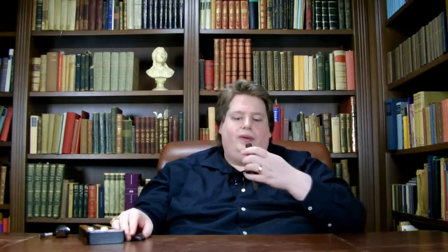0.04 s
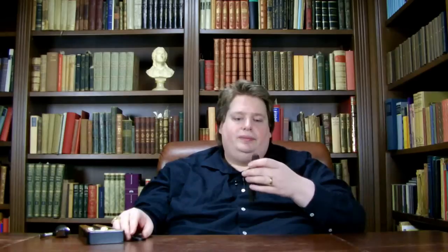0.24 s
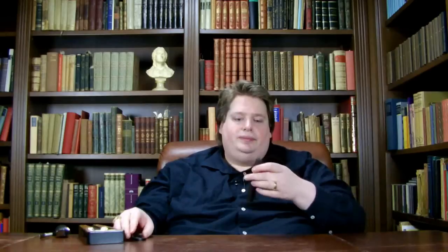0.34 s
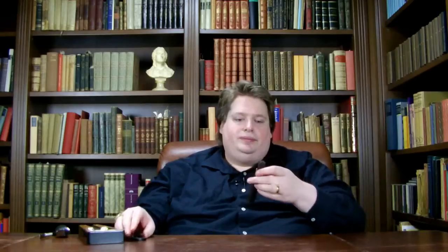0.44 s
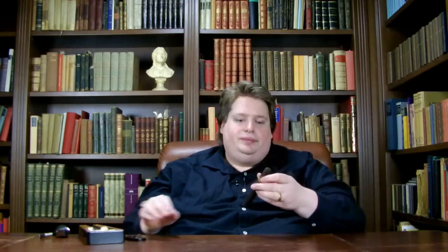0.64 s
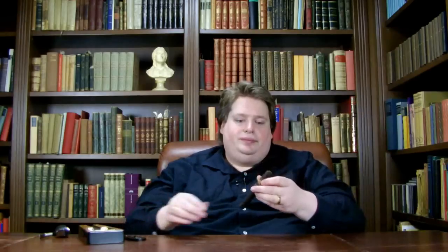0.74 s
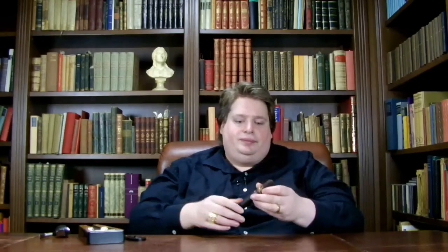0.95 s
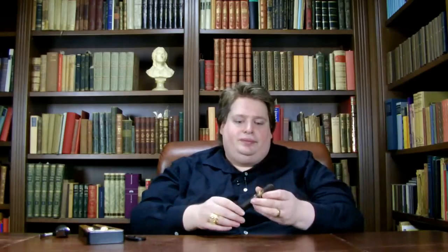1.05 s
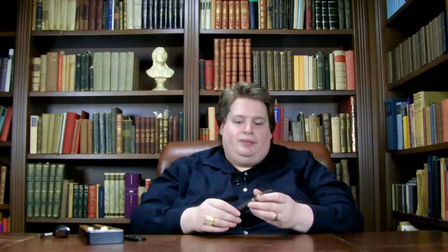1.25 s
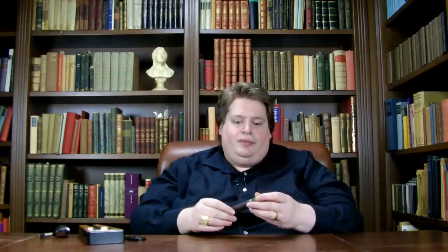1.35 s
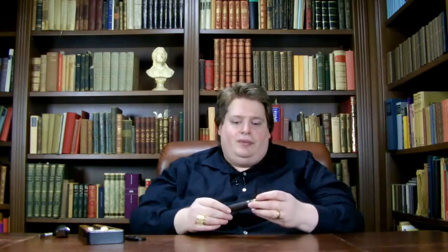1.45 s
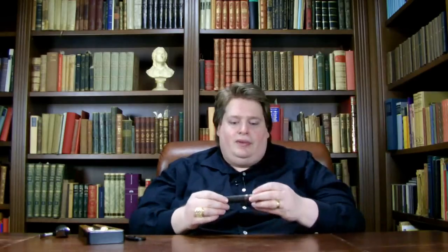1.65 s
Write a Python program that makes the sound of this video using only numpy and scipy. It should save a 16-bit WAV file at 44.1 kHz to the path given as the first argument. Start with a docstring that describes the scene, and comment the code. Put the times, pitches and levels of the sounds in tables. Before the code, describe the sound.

At about 0.2 seconds a small hard object grazes a wooden desk and lands with one sharp, bright knock. The desk and room ring briefly, fading by about 0.6 seconds. Sleeves brush very faintly from 0.4 to 1.1 seconds, and tiny clicks come near 1.2, 1.3 and 1.7 seconds. Faint, rapid electrical ticking, quiet room hush and microphone hiss run throughout.

```python
"""A knock on a wooden desk

A small hard object is put down in a book-lined room: it grazes, tips, then lands with one sharp knock.
The object clacks, the desk top rings and the room answers; sleeves brush faintly as the arms move.
Under it lie a few tiny clicks, a camera's faint electrical ticking, room hush and microphone hiss."""
import sys
import numpy as np
from scipy import signal
from scipy.fft import rfft, irfft
from scipy.io import wavfile

SR = 44100
rng = np.random.default_rng(int(sys.argv[2]) if len(sys.argv) > 2 else 0)


def digitize_waveform(pressure):
    """Quantize a signal to 16-bit integers and store it at the path in sys.argv[1].

    Rows of a 2-D input are taken as channels; values are limited to [-1, 1].
    """
    field = np.atleast_2d(pressure).T
    bounded = np.clip(field, -1, 1)
    quanta = np.round(bounded * 32767).astype(np.int16)
    wavfile.write(sys.argv[1], SR, quanta)


N = 74970

# each touch on the desk: start_s, level_db, brightness_hz
TOUCHES = [(0.221, -14.5, 950), (0.2365, -24.5, 5060), (0.2418, 0, 14200)]
# the notes that object and desk ring with: pitch_hz, level_db, fade_s (time to fall by 60 dB)
OBJECT_NOTES = [(730, -29, 0.028), (922, -37, 0.073), (1435, -31, 0.029), (2190, -20, 0.022),
                (2410, -29, 0.046), (2850, -35, 0.063), (3323, -14, 0.01), (3650, -14, 0.0088),
                (5370, -22.5, 0.0089), (5910, -23.5, 0.0077), (7580, -29.5, 0.0093), (8100, -30.5, 0.015),
                (8960, -36, 0.0085), (10260, -24, 0.0059)]
DESK_NOTES = [(320.6, -58.5, .2), (694, -50.5, 0.48), (922, -50, 0.26), (974.5, -42, 0.21),
              (1043, -38, 0.32), (1244, -43.5, .21), (1308, -51.5, 0.37), (1529, -61, 0.34),
              (2520, -43, 0.26), (2854, -49, 0.22)]
# how long the room's echo takes to fall by 60 dB: pitch_hz, fade_s
ECHO_FADES = [(250, 0.32), (700, 0.41), (1800, 0.42), (4500, 0.37), (8000, 0.3), (14000, 0.26)]
# each soft swell of noise: start_s, end_s, level_db; the first is a faint hush at the very start, the others
# are sleeves brushing as the arms move
NOISE_SWELLS = [(-.04, 0.074, -63), (0.398, 0.639, -66.5), (0.652, 1.12, -66)]
# each stray click: start_s, level_db
STRAY_CLICKS = [(.0645, -47), (1.2062, -44), (1.306, -47), (1.6735, -36.5)]

# a colour says how strong a sound's low and high parts are next to each other: pitch_hz, level_db
CRACK_COLOUR = [(100, -22.5), (400, -12.5), (1200, -8), (3300, 1), (4500, -19), (6000, 8.5), (10300, 1),
                (11700, -11), (15000, 0)]
ECHO_COLOUR = [(50, -40), (130, -28), (230, -18), (400, -4.5), (700, -1), (1600, -1.5), (2400, -0.5),
               (3500, -4), (4400, -11), (5800, -12.5), (8300, -14), (11500, -26), (15000, -28)]
SLEEVE_COLOUR = [(50, -42), (220, -17.5), (340, -7), (600, -4.5), (1000, 1), (1500, -9), (2500, -11.5),
                 (5000, -16), (12000, -26)]
CLICK_COLOUR = [(50, -22), (500, -2), (1500, 3), (3400, 1), (5000, -7), (14000, -14)]
TICK_COLOUR = [(25, -38), (60, -16), (150, -2), (400, 1.5), (1200, 0), (2000, -6.5), (3200, -11.5),
               (5000, -13), (14000, -19)]
HUSH_COLOUR = [(20, -48), (50, -21), (100, -11.5), (200, -10.5), (330, -2.5), (650, 0.5), (1100, -1.5),
               (1800, -5), (3000, -7), (6000, -21), (15000, -42)]
HISS_COLOUR = [(30, -36), (300, -9), (1500, -3.5), (5000, 1), (6500, -.5), (8900, 0), (9120, 5), (9350, 0),
               (15000, -1)]
WIDE_HISS_COLOUR = [(50, -48), (500, -9), (2500, -7), (5000, -4), (10000, -5.5), (15000, -7.5)]


def knock():
    """Each touch sets object, desk and room sounding, each muffled to its own brightness."""
    clack = ring(OBJECT_NOTES, rise_s=0.001)
    desk = ring(DESK_NOTES, rise_s=0.0029)
    blow = clack + desk + crack() + room_echo()
    out = np.zeros(N)
    for start_s, level_db, brightness_hz in TOUCHES:
        start = round(start_s * SR)
        softened = signal.lfilter(*signal.butter(2, brightness_hz, "lowpass", fs=SR), blow)
        out[start:] += gain(level_db) * softened[:N - start]
    return out


def ring(notes, rise_s):
    """A struck thing shakes at its own pitches, which build up quickly and die away."""
    t = np.arange(N) / SR
    out = np.zeros(N)
    for pitch_hz, level_db, fade_s in notes:
        out += gain(level_db - 60 * t / fade_s) * np.sin(2 * np.pi * pitch_hz * t)
    return (1 - np.exp(-t / rise_s)) * out


def crack(level_db=-26.5, peak_s=0.0012, width_s=0.00047):
    """Two hard faces meet and give off about a millisecond of bright noise."""
    t = np.arange(N) / SR
    swell = np.exp(-0.5 * ((t - peak_s) / width_s) ** 2)
    burst = swell * rng.choice([-1.0, 1.0], N)
    return gain(level_db) * tint(burst, CRACK_COLOUR)


def room_echo(level_db=-36.5, delay_s=0.003, rise_s=0.0032):
    """Sound bounces around the room and blurs into a short tail; the highest part dies first."""
    pitch_hz, time_s, bands = signal.stft(noise(ECHO_COLOUR), SR, nperseg=256)
    fade_s = look_up(ECHO_FADES, pitch_hz)[:, None]
    tail = signal.istft(bands * gain(-60 * time_s / fade_s), SR)[1][:N]
    fade_in = np.clip((np.arange(N) / SR - delay_s) / rise_s, 0, 1)
    return gain(level_db) * tail * fade_in


def sleeves(fade_s=0.05):
    """Soft swells of noise: a faint one at the very start, then cloth rubbing as the arms move."""
    t = np.arange(N) / SR
    loudness = np.zeros(N)
    for start_s, end_s, level_db in NOISE_SWELLS:
        inside_s = np.minimum(t - start_s, end_s - t)
        loudness += gain(level_db) * np.clip(inside_s / fade_s + 0.5, 0, 1)
    return loudness * noise(SLEEVE_COLOUR)


def clicks():
    """A few tiny clicks with no echo."""
    spikes = np.zeros(N)
    for start_s, level_db in STRAY_CLICKS:
        spikes[round(start_s * SR)] += gain(level_db)
    return tint(spikes, CLICK_COLOUR)


def ticking(level_db=-41.5, ticks_per_s=30, first_s=0.0318, length_s=0.0045, wobble_s=0.0006):
    """Steady electrical ticks, each a quick run of five spikes that get weaker."""
    tick = np.arange(N * ticks_per_s // SR)[:, None]
    spike = np.arange(5)
    wobble, direction = rng.uniform(-1, 1, (2, len(tick), len(spike)))
    start_s = first_s + tick / ticks_per_s + length_s * spike / len(spike) + wobble_s * wobble
    tick_db = level_db + 0.7 * rng.uniform(-1, 1, tick.shape)
    tick_db[2::3] += 1.9  # every third tick is stronger
    heights = np.sign(direction) * gain(tick_db - 1.3 * spike)
    starts = (start_s * SR).astype(int)
    spikes = np.bincount(starts.ravel(), heights.ravel(), N)[:N]
    return tint(spikes, TICK_COLOUR)


def background(hush_db=-69, hiss_db=-67, wide_db=-72):
    """Room hush and microphone hiss sit in the middle; a fainter hiss spreads left and right."""
    wide_hiss = gain(wide_db) * noise(WIDE_HISS_COLOUR) * np.array([[1], [-1]])
    return gain(hush_db) * noise(HUSH_COLOUR) + gain(hiss_db) * noise(HISS_COLOUR) + wide_hiss


def gain(level_db):
    """Turns decibels into a number to multiply by."""
    return 10 ** (np.asarray(level_db) / 20)


def look_up(table, pitch_hz):
    """Reads between a table's rows, with pitch spaced in octaves."""
    row_hz, values = np.transpose(table)
    return np.interp(np.log(pitch_hz + 1), np.log(row_hz + 1), values)


def noise(colour):
    """Steady noise of the given colour, with an average strength (rms) of 1."""
    shape = gain(look_up(colour, np.fft.rfftfreq(N, 1 / SR)))
    sound = irfft(rfft(rng.standard_normal(N)) * shape, N)
    return sound / np.sqrt(np.mean(sound ** 2))


def tint(sound, colour, size=2048):
    """Gives a sound a colour, using a filter that rings only after each spike."""
    pitch_hz = abs(np.fft.fftfreq(size, 1 / SR))
    log_gain = np.log(gain(look_up(colour, pitch_hz)))
    response = np.exp(np.conj(signal.hilbert(log_gain)))
    taps = np.fft.ifft(response).real[:size // 2]
    return signal.fftconvolve(sound, taps / np.linalg.norm(taps))[:N]


def scene():
    """Adds the knock and the quiet sounds around it."""
    return knock() + sleeves() + ticking() + clicks() + background()


def record(dry, top_hz=15400):
    """Cuts away the very highest pitches."""
    taps = signal.firwin(511, top_hz, window=("kaiser", 9), fs=SR)
    return signal.oaconvolve(dry, taps[None], "same")


dry = scene()
out = record(dry)
digitize_waveform(out)
```